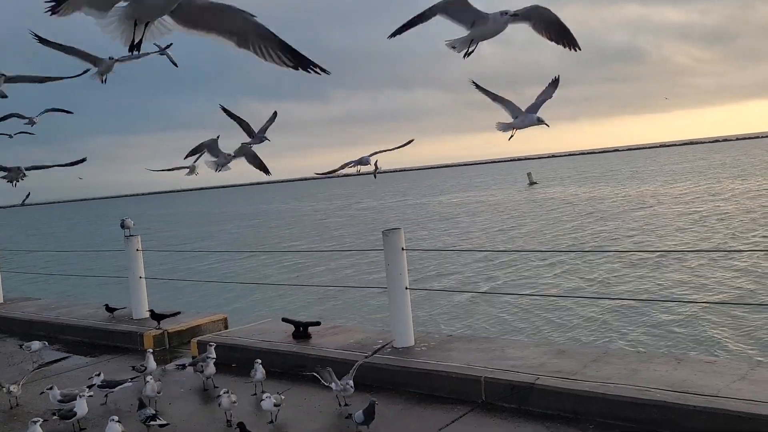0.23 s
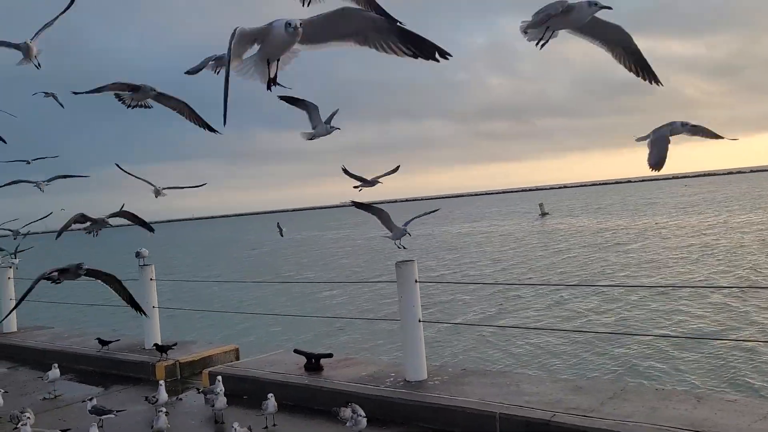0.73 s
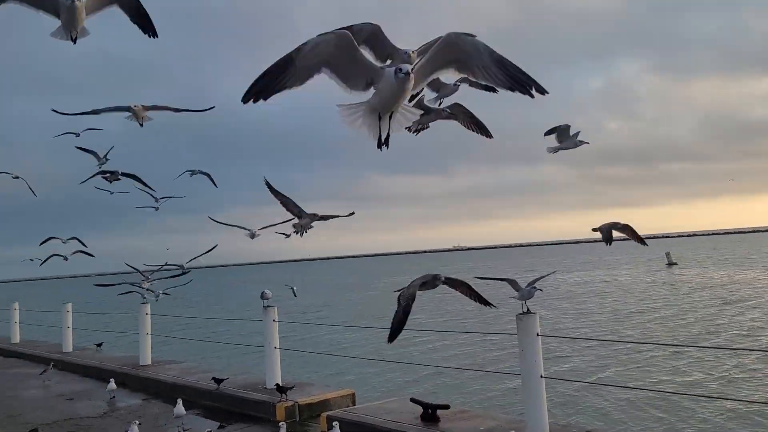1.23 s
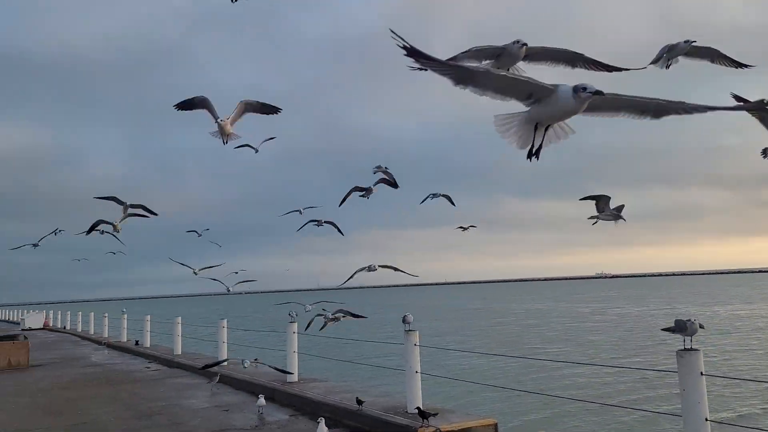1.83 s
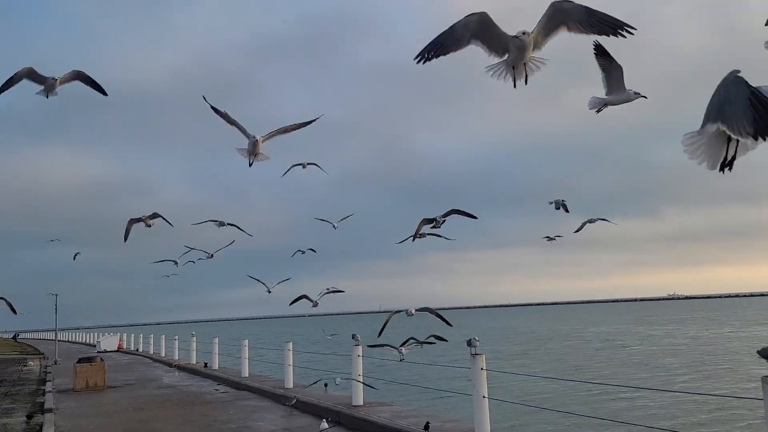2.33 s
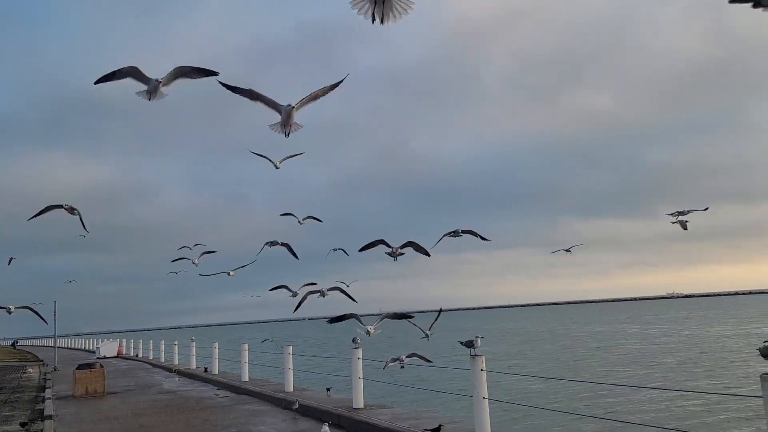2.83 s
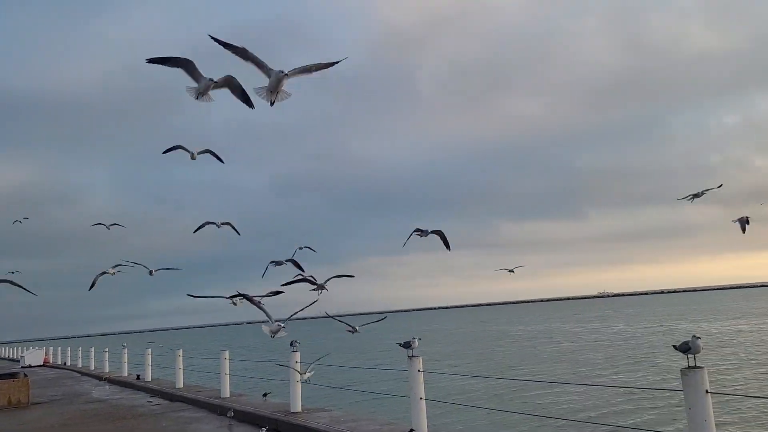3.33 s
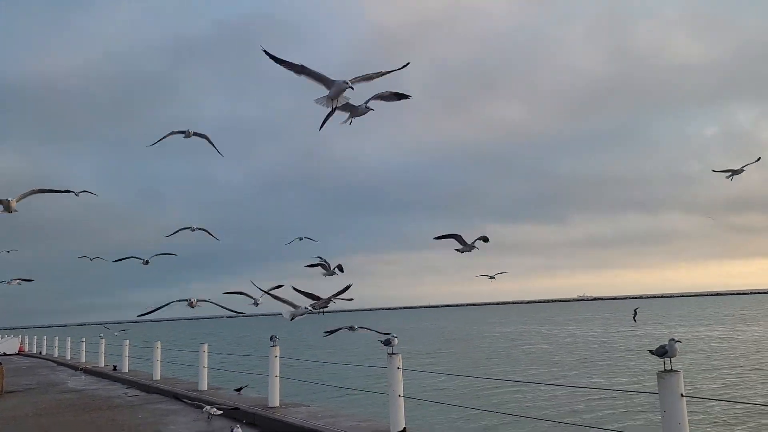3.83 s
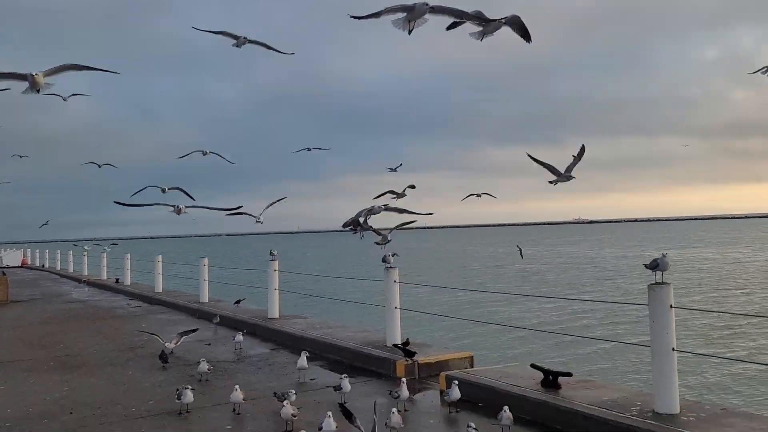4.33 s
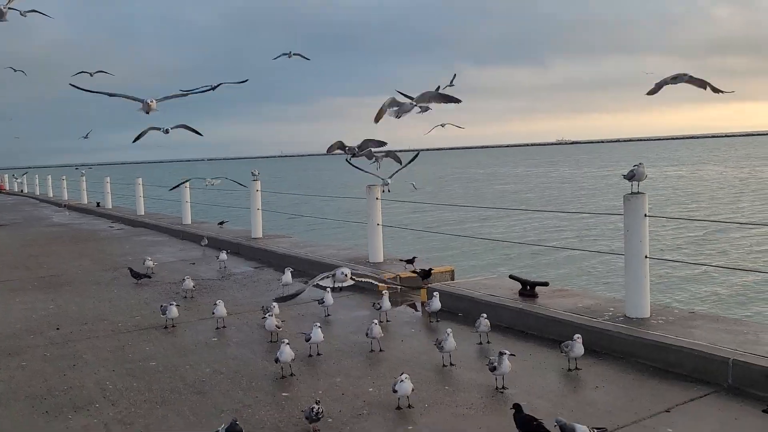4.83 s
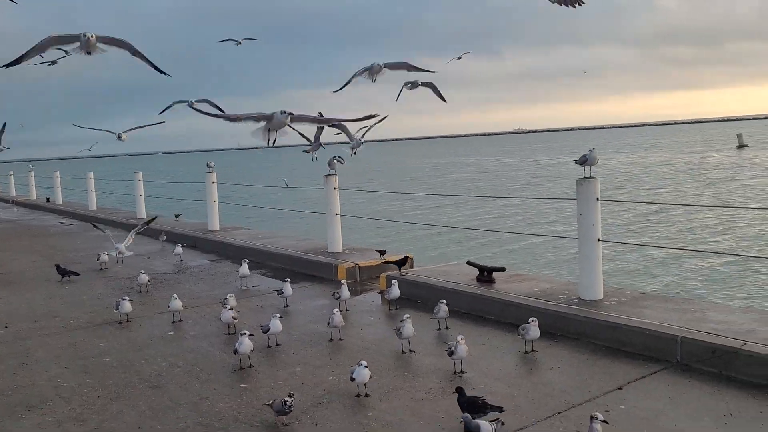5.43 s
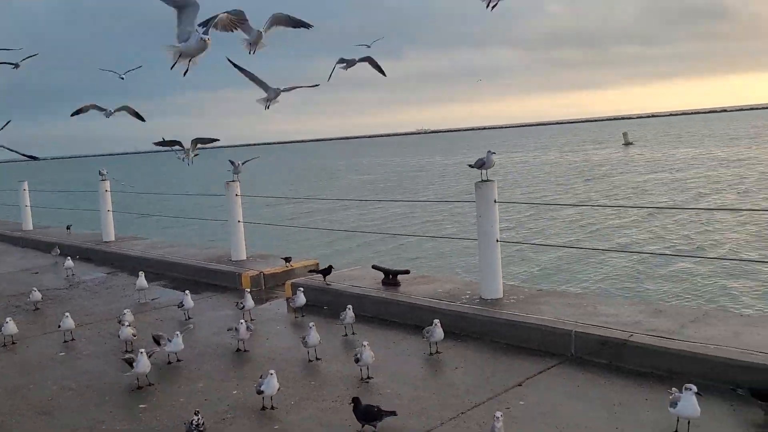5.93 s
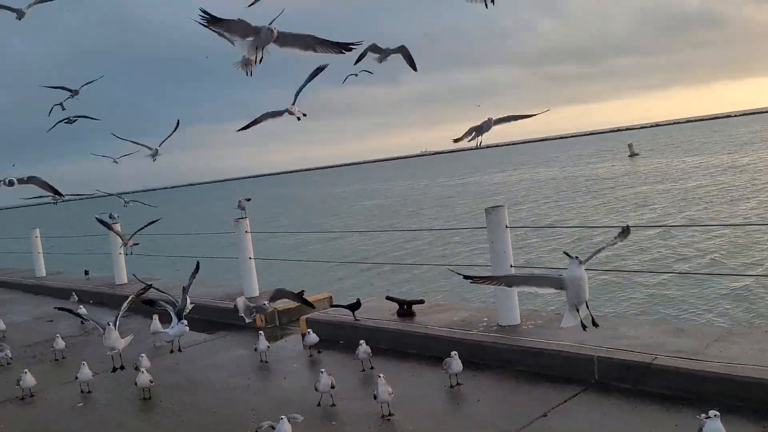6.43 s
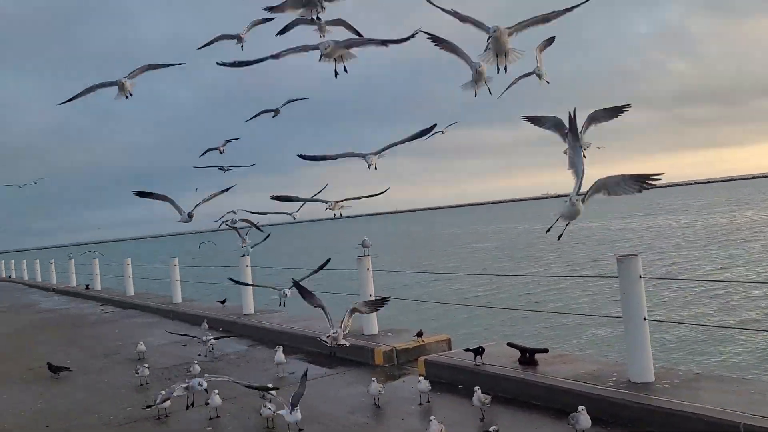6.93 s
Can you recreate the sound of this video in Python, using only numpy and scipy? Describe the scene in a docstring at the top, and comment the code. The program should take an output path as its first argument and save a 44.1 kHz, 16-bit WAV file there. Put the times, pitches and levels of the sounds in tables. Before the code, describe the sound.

Gulls cackle, whistle and screech over a waterfront pier while wind thumps and rumbles on the microphone above a faint water hiss.

```python
"""A flock of gulls begs over a windy pier, heard through the two microphones of a phone.
Wind noise buffets the microphones and filtered noise makes the bay hiss throughout. Nasal harmonic cackles
open the scene; from 0.8 s gliding sine whistles with overtones squeal, some over a lower second voice.
From 2.8 s screeches of fuzzy partials and puffs join in; after 6 s whistles warble on drawn pitch curves
and a crowd of short hoarse cries answers behind the near birds."""
import sys
import numpy as np
from scipy import signal
from scipy.fft import rfft, irfft
from scipy.io import wavfile
from scipy.ndimage import uniform_filter1d

SR = 44100
rng = np.random.default_rng(int(sys.argv[2]) if len(sys.argv) > 2 else 0)


def put_to_file(sound):
    """Save the sound as 16-bit audio at rate SR, in the file named by the first command-line argument."""
    columns = np.atleast_2d(sound).T  # one column per channel
    safe = np.clip(columns, -1, 1)
    whole_steps = np.round(safe * 32767)
    wavfile.write(sys.argv[1], SR, whole_steps.astype(np.int16))


N = 316638  # length in samples
EDGE_HZ = 15850  # top of the band
PAN_DB = -1.5  # left against right: the flock sits a little to the right


def gain_of(db):
    """Turns dB into an amplitude factor."""
    return 10 ** (np.asarray(db) / 20)


def evened(x):
    """Scales a sound to rms 1."""
    return x / np.sqrt(np.mean(x ** 2) + 1e-20)


def read(points, hz):
    """Reads a (f/Hz, value) curve along a log frequency axis."""
    f, value = np.transpose(points)
    return np.interp(np.log(hz + 1), np.log(f + 1), value)


def coloured(x, points):
    """Filters the last axis by a spectrum table."""
    f = np.fft.rfftfreq(x.shape[-1], 1 / SR)
    return irfft(rfft(x) * gain_of(read(points, f)), x.shape[-1])


def drift(shape, hz):
    """Slow random curve of rms 1 that changes about hz times a second."""
    f = np.fft.rfftfreq(shape[-1], 1 / SR)
    spectrum = rfft(rng.standard_normal(shape)) * np.exp(-(f / hz) ** 2)
    return evened(irfft(spectrum, shape[-1]))


def add(mix, s, sound, lag_ms):
    """Places a sound on both microphones, the left one later by lag_ms."""
    sound = np.pad(sound, (32, 32 + len(sound) % 2))  # room for the lag, even length
    f = np.fft.rfftfreq(len(sound), 1 / SR)
    left = irfft(rfft(sound) * np.exp(-2j * np.pi * f * lag_ms / 1000))
    pair = np.array([left, sound]) * gain_of([[PAN_DB / 2], [-PAN_DB / 2]])
    part = mix[:, round(s * SR) - 32:][:, :len(sound)]
    part += pair[:, :part.shape[1]]


def gulls():
    """All the calls of the flock, plus a faint scattered return from the pier and water."""
    # squeals, duets, warbles, cackles and crowd come from differing angles;
    # yelps share one side, and so do screeches
    mix = np.zeros((2, N))
    for calls in (squeals, yelps, duets, warbles, screeches, cackles, crowd):
        calls(mix)
    t = np.arange(4000) / SR
    scatter = rng.standard_normal((2, 4000)) * gain_of(-60 * t / 0.11)  # falls 60 dB in 0.11 s
    scatter *= gain_of(-14) / np.linalg.norm(scatter[0])
    return mix + signal.oaconvolve(mix, scatter, axes=1)[:, :N]


# gliding squeals: (start t/s, length t/s, scoop share 0-1, top f/Hz, end f/Hz, level/dB, fade/dB,
# left lag/ms, overtone boost/dB)
SQUEAL_GLIDES = [ (0.801, 0.73, 0.04, 4520, 4420, -44, 27, 0.23, 6),
                 (2.845, 0.29, 0, 5045, 4470, -22.5, 3.5, .1, -5.5),
                 (2.877, 0.75, 0.02, 2352, 2064, -35, 33, 0.13, 5),
                 (3.075, 0.28, 0.03, 3713, 3643, -35, 11.5, 0.024, -1),
                 (3.322, 0.4, 0, 4880, 4530, -36, 15.5, -0.033, -9),
                 (4.405, 0.47, 0.07, 4900, 4585, -27.5, 21.5, 0., 3.5),
                 (4.538, 0.15, 0.05, 4090, 4310, -24.5, 4.5, 0.15, 4.5),
                 (4.685, 0.15, 0, 4800, 4480, -29, -3, -0.18, 1),
                 (5.775, 0.14, 0.06, 4103, 4330, -22.5, -2, -0.26, -3),
                 (5.894, 0.21, 0, 5150, 4620, -27, -6, -0.057, -1),
                 (6.359, 0.32, 0, 2747, 2097, -31.5, 5.5, 0.053, -12),
                 (6.582, 0.43, 0, 2748, 2340, -37, 0.5, -0.0072, -3),
                 (6.601, 0.29, 0, 5410, 4510, -34.5, 3.5, -0.165, 3),
                 (6.967, 0.4, 0.05, 5080, 4960, -33, 18, 0.02, -4.5)]


def squeals(mix):
    """Single whistles; low birds and those after the crowd starts have worn voices."""
    for *shape, lag_ms, boost_db in SQUEAL_GLIDES:
        start, top_hz = shape[0], shape[3]
        worn = .9 if start > CROWD_SPANS[0][0] or top_hz < 3000 else .25
        add(mix, start, squeal(glide(*shape), boost_db=boost_db, worn=worn), lag_ms)


# short yelps between and into the squeals: (start t/s, length t/s, first f/Hz, last f/Hz, level/dB)
YELP_GLIDES = [(0.834, 0.09, 4250, 4280, -41), (0.843, 0.08, 4800, 5100, -38),
               (1.631, 0.039, 10500, 12850, -33.5), (2.771, 0.11, 3660, 4400, -31),
               (3.23, 0.11, 5320, 5300, -44), (3.121, 0.036, 3430, 3000, -23),
               (3.771, .033, 4360, 4640, -45.5), (3.864, 0.03, 4470, 4670, -47.5),
               (4.629, 0.074, 2380, 2506, -40.5), (4.861, 0.073, 4000, 3700, -40.5),
               (6.044, 0.029, 2275, 2750, -31), (6.1, 0.039, 3750, 4060, -28),
               (6.19, 0.063, 4670, 4380, -24.5), (6.304, 0.0355, 4000, 4530, -21.5),
               (7.019, 0.069, 2520, 2130, -33.5), (7.12, 0.047, 5340, 5580, -35.5)]


def yelps(mix):
    """Brief whistles on a straight pitch line, all from one side."""
    for s, length, first_hz, last_hz, db in YELP_GLIDES:
        add(mix, s, squeal([(s, first_hz, db), (s + length, last_hz, db)]), -.05)


# squeals with a lower second voice: (start t/s, length t/s, scoop share 0-1, top f/Hz, end f/Hz,
# level/dB, fade/dB, left lag/ms, first pitch ratio of the lower voice)
DUET_GLIDES = [(0.886, 0.23, 0, 5940, 5110, -32.5, 30, -0.11, 0.47),
               (0.918, 0.24, 0.03, 5100, 4570, -35, 18.5, 0.33, 0.53),
               (1.678, .235, 0.05, 5150, 4520, -32, 14, -0.031, 0.55),
               (4.228, 0.18, 0.2, 5564, 5240, -18.5, 17.5, -0.025, 0.62)]
LOWER_DB, SUM_DB = -10, -2  # lower voice under the whistle, sum tones over the lower voice


def duets(mix):
    """Whistles over a lower voice, which also mixes with them into sum tones."""
    for *shape, lag_ms, ratio in DUET_GLIDES:
        add(mix, shape[0], squeal(glide(*shape), ratio, LOWER_DB, SUM_DB, rasp_db=-22), lag_ms)


# warbling squeals, one curve each: (t/s, f/Hz, level/dB)
WARBLE_CURVES = [
    [(6.066, 3674, -18.5), (6.108, 3257, -28), (6.162, 3643, -24.5), (6.234, 3605, -32.5),
     (6.31, 3327, -34), (6.679, 3800, -37)],
    [(6.326, 5100, -16), (6.44, 4714, -25.5), (6.483, 4930, -27.5), (6.57, 4540, -34.5),
     (6.66, 4520, -31.5)],
    [(6.362, 1811, -29), (6.387, 1995, -26), (6.429, 1819, -28.5), (6.479, 2015, -29), (6.523, 1832, -30.5),
     (6.551, 1908, -25), (6.689, 1927, -44)],
]
# delay of the left microphone, one per warble: (left lag/ms)
WARBLE_LEFT_LAGS = [0.022, -0.2647, 0.15]


def warbles(mix):
    """Worn, two-voiced whistles that follow drawn pitch and level curves."""
    for rows, lag_ms in zip(WARBLE_CURVES, WARBLE_LEFT_LAGS):
        call = squeal(rows, lower_db=-20, sum_db=6.0, rasp_db=-20.5, worn=0.97)
        add(mix, rows[0][0], call, lag_ms)


SCOOP_S, ONSET_DB = 0.02, -68  # slide time; the deeper the slide, the softer the start (dB per share)
BEND = 1.7  # pitch and level hold at first, then give way faster


def glide(start, length, scoop, top_hz, end_hz, db, fade_db):
    """Scoops up into the note, holds, then pitch and level move to their end values."""
    t = np.arange(0, length, 1 / 500)
    early, late = np.exp(-(t / SCOOP_S) ** 2), (t / length) ** BEND
    hz = (top_hz + (end_hz - top_hz) * late) * (1 - scoop * early)
    return np.transpose([start + t, hz, db - fade_db * late + ONSET_DB * scoop * early])


# octave overtone against the whistle, by whistle pitch: (f/Hz, level/dB)
OCTAVE_BY_PITCH = [(2100, -8.5), (2800, -1.5), (5300, -12.5)]
# relative colour of breath and throat noise: (f/Hz, level/dB per Hz)
RASP_COLOUR = [(1500, -19.5), (2500, 2.5), (4500, -4), (16000, -10)]
CRACK_DB = 0.5  # depth of the gaps where a fully worn voice cracks


def squeal(rows, ratio=.5, lower_db=-60, sum_db=0, rasp_db=-24, waver=0.00537, boost_db=0, worn=.3):
    """A whistle with two overtones, a lower voice and sum tones, breath and fuzzy side tones; it cracks."""
    s, hz, db = np.transpose(rows)
    t = np.arange(s[0], s[-1], 1 / SR)
    wobble, flutter, crack, fuzz, grain = [drift((SR,), rate)[:len(t)] for rate in (33, 55, 15, 110, 280)]

    hz = uniform_filter1d(np.interp(t, s, hz), size=500, mode="nearest")
    hz = hz * (1 + waver * wobble + 0.015 * worn * np.tanh(4 * crack))  # cracks jump in pitch
    turn = 2 * np.pi * np.cumsum(hz) / SR
    overtone_db = read(OCTAVE_BY_PITCH, hz) + boost_db
    tone = np.sin(turn)
    tone += gain_of(overtone_db) * np.sin(2 * turn) * (2 * hz < EDGE_HZ)
    tone += gain_of(1.26 * overtone_db - 5.5) * np.sin(3 * turn) * (3 * hz < EDGE_HZ)

    sinking = .49 + (ratio - .49) * np.exp(-(t - s[0]) / 0.11)  # lower voice settles just below the half
    low = 2 * np.pi * np.cumsum(hz * sinking) / SR
    sums = np.sin(low + turn) + 0.46 * np.sin(low + 2 * turn)
    swell = gain_of(lower_db) * np.clip((t - s[0]) / 0.06, 0, 1) ** 3  # it sets in late
    tone += swell * (np.sin(low) + gain_of(sum_db) * sums)

    breath = evened(coloured(rng.standard_normal(2 * len(t)), RASP_COLOUR))[:len(t)]
    side_tones = fuzz * (np.sin(.75 * turn) + .5 * np.sin(1.5 * turn))
    rasp = gain_of(rasp_db) * (breath + side_tones)

    gaps_db = CRACK_DB * np.maximum(1 - abs(crack) * 4, 0)
    unsteady = gain_of(worn * (4.34 * flutter - gaps_db)) + 0.18 * grain
    ends = signal.windows.tukey(len(t), min(0.018 / (s[-1] - s[0]), 1))  # soft start and stop
    return gain_of(np.interp(t, s, db)) * ends * (np.sqrt(2) * tone * unsteady + rasp)


# rasping screeches: (start t/s, end t/s, level/dB before the fades, added colour slope/dB per octave)
SCREECH_SPANS = [(2.839, 3.042, -34, -2.5), (3.025, 3.176, -28, -5), (4.608, 4.825, -33.5, -2.5),
                 (5.797, 6.115, -30, -0.5), (6.499, 6.794, -36.5, 0), (6.901, 6.986, -22, -5)]


def screeches(mix):
    """Harsh screams, all from one side."""
    for row in SCREECH_SPANS:
        add(mix, row[0], screech(*row), -.2)


def screech(start, end, db, slope_db, pitch_hz=1180):
    """A harsh scream: a sinking stack of fuzzy, broken partials and puffs of air through the open throat."""
    size = 2 * round((end - start) * SR / 2)
    turn = 2 * np.pi * np.cumsum(pitch_hz * np.linspace(1, .93, size)) / SR
    fuzz = drift((12, size), 120)  # one rough level curve per partial
    partials = sum(f * np.sin((k + 1) * turn) for k, f in enumerate(fuzz))
    puffs = rng.standard_normal(size) * gain_of(3. * drift((size,), 50))
    throat = [(hz, level + slope_db * np.log2(hz)) for hz, level in RASP_COLOUR]
    scream = evened(coloured(evened(partials) + evened(puffs), throat))
    return gain_of(db) * scream * np.hanning(size)


# nasal cackles: (about the middle t/s, top f/Hz, level/dB before the fades)
CACKLE_NOTES = [(0.272, 445, -45), (0.585, 435.5, -43.5), (1.16, 832, -47.5), (1.243, 442, -42),
                (1.56, 456, -46), (1.912, 434, -43), (2.309, 421, -44), (2.399, 464, -45),
                (4.119, 431, -44), (4.55, 465, -42), (5.539, 414, -46), (5.65, 419, -44), (5.721, 425, -41),
                (6.94, 450, -52)]


def cackles(mix):
    """Short nasal notes, each from a random side with a random gape."""
    for s, hz, db in CACKLE_NOTES:
        add(mix, s - .037, cackle(hz, db, rng.random()), rng.uniform(-0.22, 0.39))


# cackle colour at a half-open bill: (f/Hz, level/dB)
BILL_COLOUR = [(400, -56), (820, -13.5), (1260, -18.5), (2500, -24.5), (4640, -25), (9000, -41)]


def cackle(top_hz, db, gape):
    """A short harmonic stack whose pitch arches, hoarse at both ends; gape lengthens it and lifts its colour."""
    u = np.linspace(-1, 1, 2 * round((.055 + .03 * gape) * SR / 2))
    turn = 2 * np.pi * np.cumsum(top_hz * (1 - 0.21 * (u - .15) ** 2)) / SR
    stack = sum(rng.uniform(0.43, 1) * np.cos(k * turn + k * k) for k in range(1, 21))
    hoarse = (0.5 + .5 * u ** 2) * rng.standard_normal(len(u))
    bill = [(hz * 1.17 ** (gape - .5), level) for hz, level in BILL_COLOUR]
    note = evened(coloured(evened(stack) + hoarse, bill))
    return gain_of(db) * note * (1 - u ** 2) ** 0.49


# the crowd behind the near birds: (start t/s, end t/s, peak level/dB of the whistles)
CROWD_SPANS = [(6.249, 6.879, -30.5)]


def crowd(mix, count=12):
    """Short, wavering, hoarse cries of random pitch, length and side, each with a low squawk before it."""
    for start, end, db in CROWD_SPANS:
        for k, (when, long, pitch, arch, side) in enumerate(rng.random((count, 5))):
            length, hz = 0.03 + 0.06 * long, 1400 * 3.2 ** pitch
            s = start + (k + when) / count * (end - start - length)
            rows = [(s, hz * (1 - .1 * arch), db - 8),
                    (s + .4 * length, hz, db),
                    (s + length, .95 * hz, db - 8)]
            add(mix, s, squeal(rows, lower_db=-16, rasp_db=-8, waver=.015), .5 * side - .25)
            squawk = cackle(480 * (1 + long), db - 10, arch)
            add(mix, s - length, squawk, .5 * pitch - .25)


# wind on the microphones, before the eddies: (t/s, level/dB)
WIND_LEVEL = [(0.03, -38), (.4, -40), (.9, -33.5), (1.45, -40), (1.9, -31), (2.5, -40), (2.78, -28),
              (3.9, -38.5), (5.75, -48.5), (6.2, -37.5), (6.95, -32), (7.05, -47.5)]
# sudden buffets: (t/s, peak level/dB on the harder-hit microphone)
BUFFET_HITS = [(0.014, -16), (0.234, -22), (0.476, -22), (0.822, -25), (1.856, -8.5), (2.294, -18.5),
               (2.739, -15.5), (3.671, -35.5), (3.824, -29.5)]
# relative colour of the wind: (f/Hz, level/dB per Hz)
WIND_COLOUR = [(18, -15.5), (60, 2.5), (130, 1), (270, -3.5), (700, -20.5), (2000, -37.5), (5000, -81.5)]


def wind():
    """Lumpy turbulence, separate noise at the two ports; stronger eddies and gusts reach higher."""
    t = np.arange(N) / SR
    eddies = drift((2, N), 44.3) + drift((N,), 12.6)  # own and shared
    eddies = 2.89 * np.tanh(eddies / 2.87)  # the strongest eddies level off
    noise = evened(coloured(rng.standard_normal((2, N)), WIND_COLOUR))
    deep = signal.sosfilt(signal.butter(2, 110, fs=SR, output="sos"), noise)
    level_db = np.interp(t, *np.transpose(WIND_LEVEL))
    out = deep * gain_of(3.95 * eddies - 0.49 * (level_db + 37))  # the depths swing less than the top
    out += gain_of(-5.0) * (noise - deep) * gain_of(7.13 * eddies)
    out *= gain_of(level_db)

    slap = signal.sosfilt(signal.butter(1, 300, "high", fs=SR, output="sos"), noise)
    slap = np.roll(slap, 9000, axis=1)  # away from the same noise in the bed
    for s, peak_db in BUFFET_HITS:
        since = np.maximum(t - s, 0)
        shape = (1 - np.exp(-since / 0.00049)) ** 2 * np.exp(-since / 0.025)
        burst = shape * slap
        out += gain_of(peak_db) * burst / abs(burst).max()
    return out


# relative colour of the bay: (f/Hz, level/dB per Hz)
BAY_COLOUR = [(300, -29), (820, 11.5), (2000, -6), (4400, -6.5), (9000, -11.5), (11000, -11), (16000, -5.5)]
BAY_DB = -54  # rms before the swell


def bay():
    """Smooth distant hiss of water and air, partly shared by the ports."""
    common, own = rng.standard_normal(N), rng.standard_normal((2, N))
    swell = gain_of(drift((N,), 3))
    return gain_of(BAY_DB) * swell * evened(coloured(0.34 * common + own, BAY_COLOUR))


def scene():
    """Gulls in front, wind on the microphones, the bay behind."""
    return gulls() + wind() + bay()


def record(dry):
    """The band limit: a steep low-pass at the top of the band."""
    lowpass = signal.firwin(511, EDGE_HZ, window=("kaiser", 9), fs=SR)
    return signal.oaconvolve(dry, lowpass[None], "same")


dry = scene()
out = record(dry)
put_to_file(out)
```